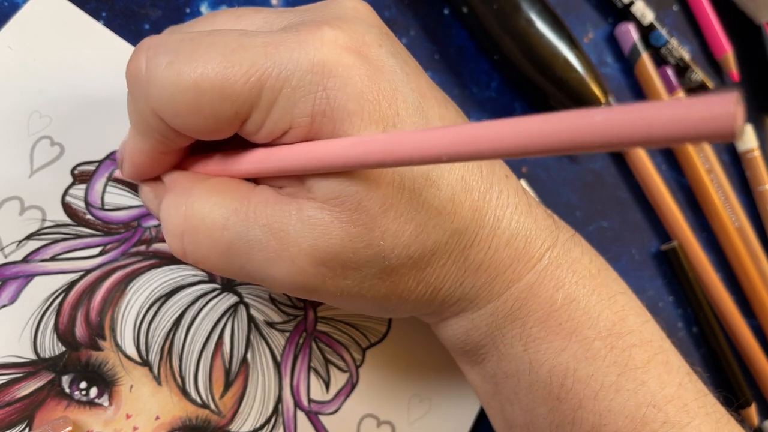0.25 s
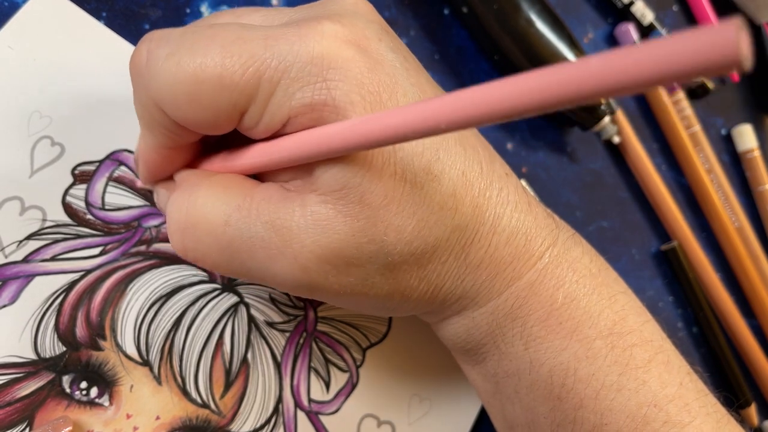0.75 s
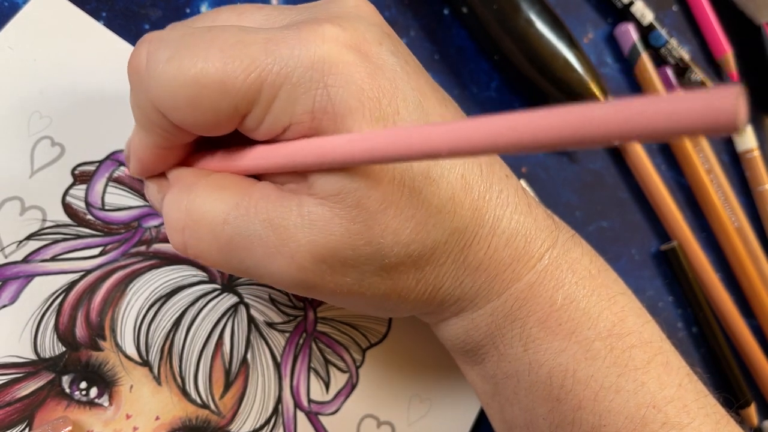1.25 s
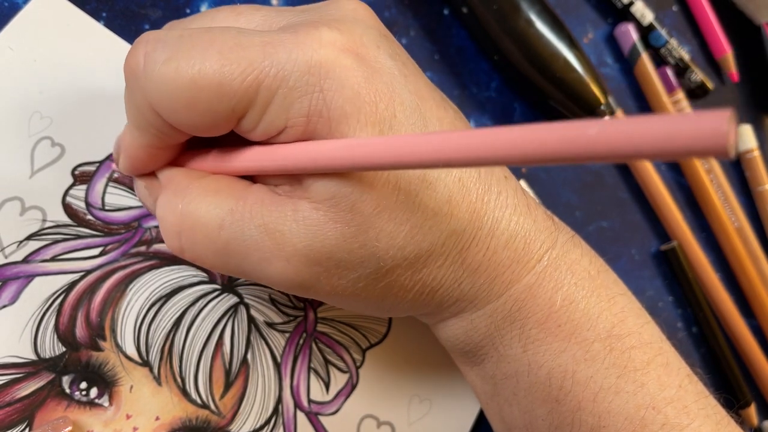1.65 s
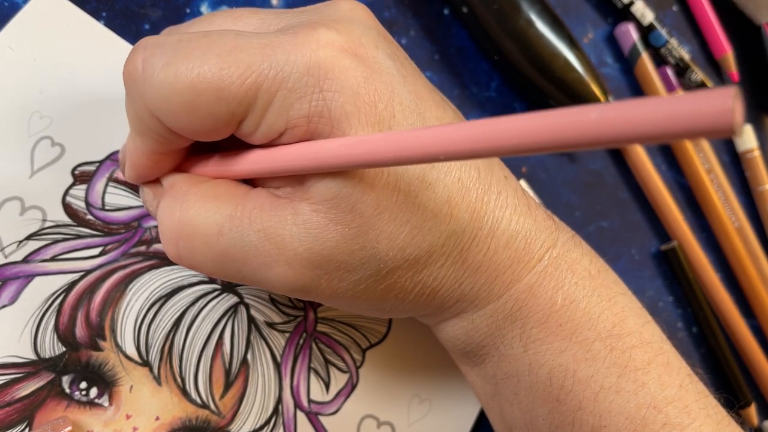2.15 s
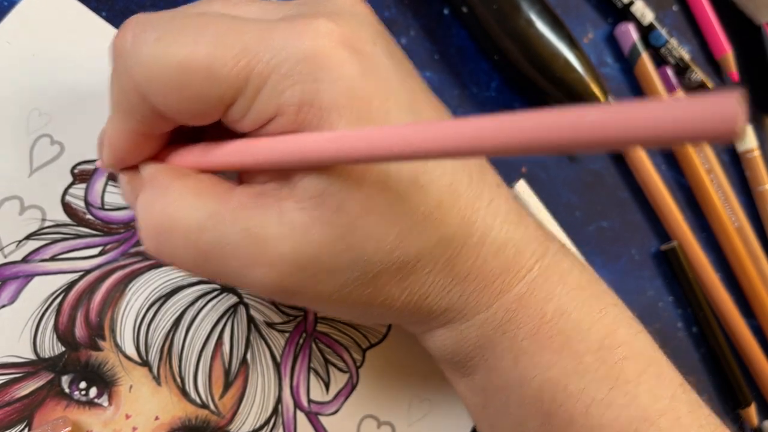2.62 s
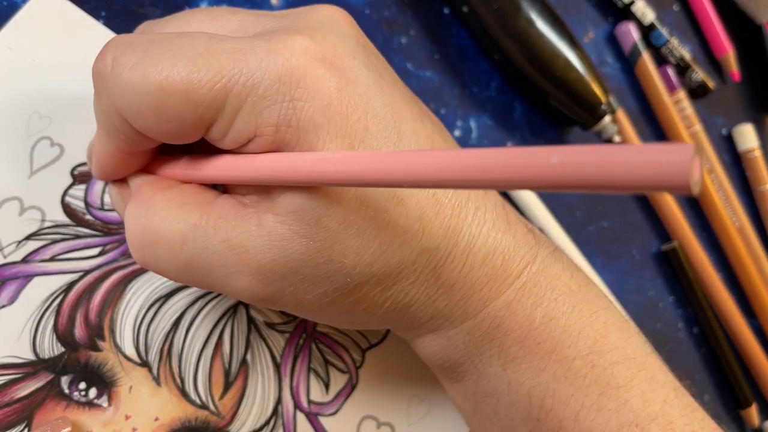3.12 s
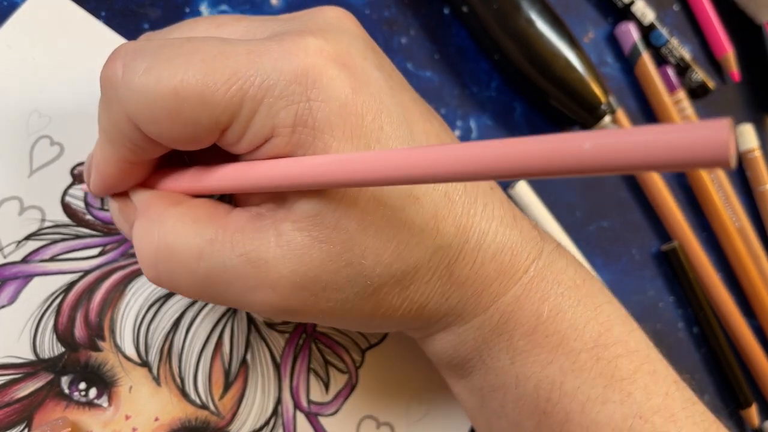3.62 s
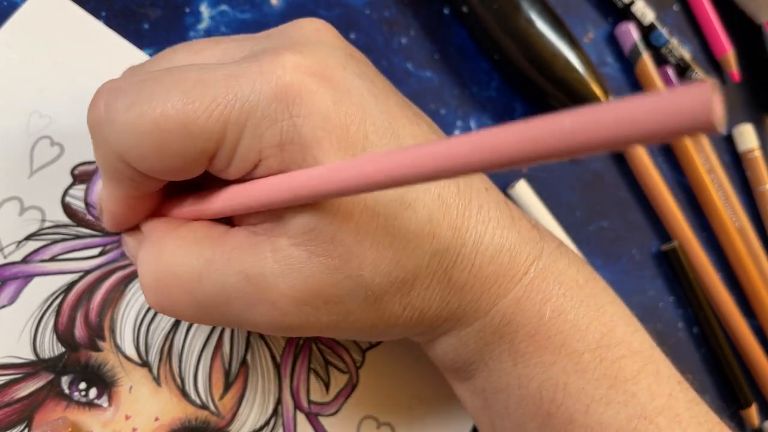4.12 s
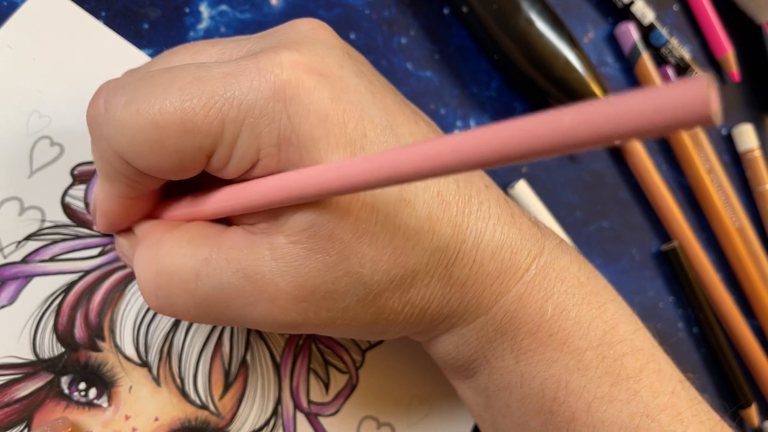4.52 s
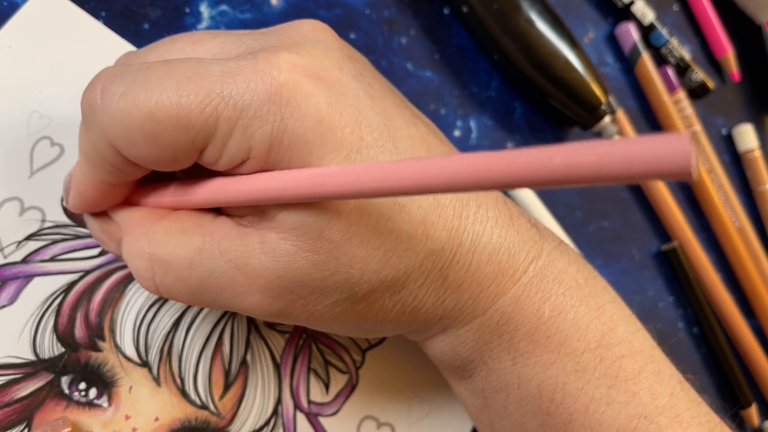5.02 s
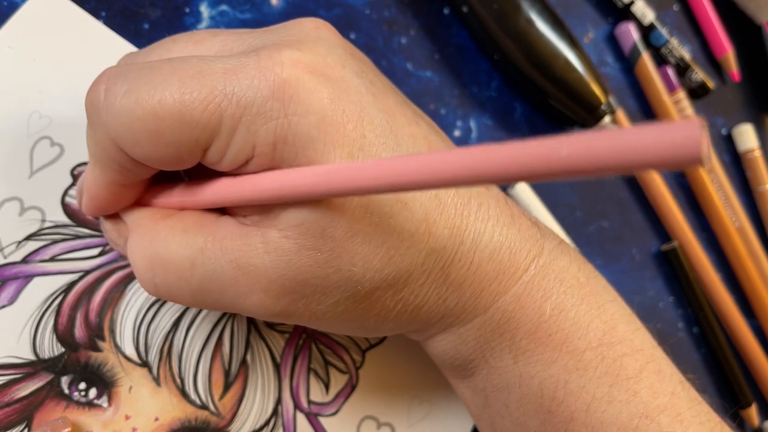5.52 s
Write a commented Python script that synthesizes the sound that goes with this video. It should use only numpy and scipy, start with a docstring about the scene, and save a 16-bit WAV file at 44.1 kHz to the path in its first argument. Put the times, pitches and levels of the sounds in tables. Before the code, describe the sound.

Close, light scratching of a colored pencil runs quickly back and forth over paper in a quiet indoor room. The pressure rises and falls, with a short slide and a single tick near the middle, then a brief lull before firmer shading picks up again. The desk murmurs softly under the hand. A low room rumble and faint fan hum continue throughout, and a far motor drone comes and goes.

```python
"""Coloured pencil shading paper

A pencil shades a small patch, about ten strokes a second, close by in a quiet room. Friction over the
paper's tooth excites resonances of pencil, paper and cupped hand, which change with the grip.
Midway the hand slides to a new place with one small tick. The desk murmurs under the strokes;
a fan hums, a far motor swells and fades, and the room rumbles."""
import sys
import numpy as np
from scipy import signal
from scipy.fft import rfft, irfft
from scipy.io import wavfile
from scipy.ndimage import uniform_filter1d

SR = 44100
rng = np.random.default_rng(int(sys.argv[2]) if len(sys.argv) > 2 else 0)


def generate_wav(signal):
    """Clip the signal to [-1, 1] and save it as 16-bit WAV at the path in sys.argv[1]."""
    frames = np.transpose(np.atleast_2d(signal))
    scaled = np.clip(frames, -1, 1) * 32767
    pcm = np.round(scaled).astype(np.int16)
    wavfile.write(sys.argv[1], SR, pcm)


N = 254016

# Resonances of pencil, paper and cupped hand in each grip: pitch_hz, width_hz, gain_db
UPRIGHT = [(2270, 790, -0.5), (3140, 700, -1.5), (3920, 340, 0), (4390, 450, -0.5), (5095, 430, 2),
           (5550, 200, -0.5), (6080, 360, -2), (6710, 900, -0.5), (8260, 630, -2.5), (9550, 670, -3),
           (10860, 1900, -4.5), (11900, 390, -3), (12600, 750, -5.5), (13900, 820, -7), (15300, 1900, -8)]
SLIDING = [(2190, 1200, -1), (3120, 1000, -1), (4711, 1500, 3), (5970, 1023, -1), (6941, 820, 3),
           (8200, 877, 3), (9260, 690, 0), (10662, 1925, -0.5), (13250, 4200, -9)]
FLAT = [(2220, 506, 2.5), (4100, 1500, -1.5), (4730, 500, 0.5), (5360, 1200, -3.5), (7400, 2077, -10),
        (9600, 1499, -9), (11421, 1447, -7.5), (14700, 3800, -15)]
TURNED = [(2273, 540, 2), (3070, 360, -2.5), (3930, 320, -4.5), (4620, 1050, -2), (5140, 830, -4.5),
          (6100, 580, -1.5), (6640, 810, -2.5), (8100, 650, -7), (9340, 1150, -7), (11375, 4000, -9.5),
          (12700, 700, -8), (13900, 600, -6), (14800, 1300, -4.5)]
# Grips in turn: start_s, resonances, forward_over_back_treble_db
GRIPS = [(0, UPRIGHT, 3), (2.47, SLIDING, -10), (2.72, FLAT, 2), (3.95, TURNED, 3)]
# Runs of alternating strokes; a crest is the place of the strongest rub, 0-1 along the stroke:
# first_middle_s, count, period_s, slowing_s_per_stroke, contact_s, forward_lag_and_back_lead_s,
# forward_over_back_db, forward_crest, back_crest
STROKE_RUNS = [(.054, 10, .1051, -.001, .076, -.001, 1, .56, .2),
               (1.056, 4, .113, -.004, .088, 0, -1.5, .58, .25),
               (1.488, 11, .101, -.0008, .052, .014, -1.5, .75, .25),
               (2.847, 9, .0927, .004, .076, -.003, 3, .6, .52),
               (4.053, 18, .1033, -.0005, .076, .002, 1, .48, .3)]
# Strength of the strokes as the hand bears down: time_s, relative_level_db
HAND_PRESSURE = [(0, -67.5), (.22, -68), (.55, -65), (.94, -68), (1.04, -60.5), (1.22, -64.5),
                 (1.65, -66.5), (1.8, -71), (2.25, -70.5), (2.45, -73), (2.85, -71.5), (3.37, -68),
                 (3.48, -75), (3.8, -79), (3.98, -64), (4.85, -68), (5.15, -66.5), (5.76, -69.5)]
# Drags of the lead as the hand moves to a new place: start_s, end_s, crest, relative_level_db
SLIDES = [(2.491, 2.571, 0.5, -66), (2.547, 2.637, 0.55, -61.5)]
# Impact of the pencil: start_s, level_db
TICKS = [(2.7487, -43.5)]
# Its heavily damped modes: pitch_hz, time_constant_s, gain_db
TICK_MODES = [(600, .0004, 2), (1900, .0003, -9), (4200, .0004, -2), (6000, .00035, -5.5),
              (7900, .0003, -12), (11000, .0001, -10)]
# Reflections from the desk top and a nearby surface: delay_s, gain_db
ECHOES = [(.0027, -14), (.0093, -18)]
# Resonances of the desk: pitch_hz, width_hz, gain_db
DESK_MODES = [(410, 220, 2.5), (630, 256, 0.5), (763, 63, -0.5), (861, 55, -0.5), (992, 99, -9),
              (1230, 345, -16)]
# Murmur of the desk under the hand: time_s, level_db
DESK_LEVELS = [(0, -60), (.6, -62), (1.2, -59), (2.4, -59.5), (3.3, -67), (4.3, -61.5), (4.9, -62),
               (5.5, -57)]
# Tones of the fan and its motor: pitch_hz, level_db
FAN_TONES = [(238, -65.5), (356, -68), (420, -80.5), (460, -62.5), (1183, -88.5), (1577, -93), (1841, -85)]
# Two groups of low room resonances: pitch_hz, width_hz, gain_db
RUMBLE_MODES = [(113.6, 24, -4), (132, 35, 2.5), (169, 26, -6.5)]
BOOM_MODES = [(276.9, 30.5, 7), (289.2, 38, -5)]
# Their rise and fall: time_s, rumble_db, boom_db
ROOM_LEVELS = [(.15, -49.5, -58), (.45, -56, -54), (1.0, -54, -51), (1.6, -53.5, -58.5), (2.2, -51.5, -56),
               (2.9, -57, -59), (3.6, -57.5, -61), (4.7, -60.5, -58.5), (5.76, -56.5, -60)]
# Spectrum of still air and microphone hiss: frequency_hz, relative_density_db
AIR_SPECTRUM = [(10, 2.5), (25, -5), (45, -3), (62, -6), (78, -13), (170, -15.5), (215, -17.5), (420, -18),
                (560, -32), (1000, -34.5), (1500, -40.5), (2400, -45), (5000, -47), (16000, -49.5)]

FRESH_DB, WORN_DB, WEAR_S = 3, -2, 0.98  # treble of a fresh and a flat edge; time constant of wear
TREBLE_HZ, CUTOFF_HZ = 8500, 15780
FORWARD_LONGER = 0.036  # share of the contact time that forward strokes gain and back strokes lose


def pencil():
    """Friction noise, filtered by resonance: each grip turns up a fresh edge that dulls as it wears."""
    out, rubs = np.zeros(N), strokes()
    middles_s = [(start + end) / 2 for start, end, *_ in rubs]
    grip_of = np.searchsorted([grip[0] for grip in GRIPS[1:]], middles_s)
    for grip, (grip_start, modes, push_db) in enumerate(GRIPS):
        rasp = resonate(tooth(grains_per_s=20000, spread_db=3, patchy_db=1.17), modes)
        treble = irfft(rfft(rasp) / (1 + (TREBLE_HZ / bins()) ** 8), N)
        for k in np.flatnonzero(grip_of == grip):
            start, end, crest, db, direction = rubs[k]
            freshness = np.exp(-max(start - grip_start, 0) / WEAR_S)
            edge_db = WORN_DB + (FRESH_DB - WORN_DB) * freshness
            treble_gain = undb(edge_db + direction * push_db / 2)
            out += undb(db) * tip_speed(start, end, crest) * (rasp + (treble_gain - 1) * treble)
    return out


def tooth(grains_per_s, spread_db, patchy_db):
    """Shot noise: the lead snaps over paper fibres at random, in smoother and rougher patches."""
    hit = rng.random(N) < grains_per_s / SR
    size = rng.choice([-1, 1], N) * undb(spread_db * rng.standard_normal(N))
    return hit * size * undb(patchy_db * wander(rate_hz=200))


def strokes():
    """The hand oscillates at a drifting pace. Slides and strokes: start_s, end_s, crest, db, direction."""
    rubs = [(*slide, 1) for slide in SLIDES]
    for first, count, period, slowing, contact, lag, accent_db, forward_crest, back_crest in STROKE_RUNS:
        for k in range(count):
            direction, crest = (1, forward_crest) if k % 2 else (-1, back_crest)
            middle = first + period * k + slowing * k * k / 2 + direction * lag
            half = contact * (1 + direction * FORWARD_LONGER) / 2
            db = np.interp(middle, *np.transpose(HAND_PRESSURE)) + direction * accent_db / 2
            rubs.append((middle - half, middle + half, crest, db, direction))
    return rubs


def tip_speed(start, end, crest):
    """Friction noise grows in proportion to speed, which rises from rest and falls to zero at the turn."""
    crest_s = start + crest * (end - start)
    progress = np.interp(times(), [start, crest_s, end], [0, .5, 1])
    return np.sin(np.pi * progress)


def tick():
    """Impact on something hard excites damped modes that swell and die within a millisecond or two."""
    out, t = np.zeros(N), times()[:SR // 20]
    ring = sum(undb(db) * np.sin(2 * np.pi * hz * t) * t / tau * np.exp(1 - t / tau)
               for hz, tau, db in TICK_MODES)
    for start_s, db in TICKS:
        i = int(start_s * SR)
        out[i:i + len(t)] -= undb(db) * ring
    return out


def reflect(x):
    """Comb filtering: early echoes from nearby surfaces interfere with the direct sound."""
    response = 1 + sum(undb(db) * np.exp(-2j * np.pi * bins() * delay) for delay, db in ECHOES)
    return irfft(rfft(x) * response, N)


def desk(stroke_share):
    """Forced vibration: the desk murmurs under the moving hand, a little more during each stroke."""
    motion = unit(sum(tip_speed(start, end, crest) for start, end, crest, _, _ in strokes()))
    body = resonate(tooth(grains_per_s=5000, spread_db=5, patchy_db=0.75), DESK_MODES)
    return body * undb(curve(DESK_LEVELS)) * (1 - stroke_share + stroke_share * motion)


def room():
    """Room resonance: low modes excited by noise rumble and boom at slowly changing levels."""
    rumble = resonate(rng.standard_normal(N), RUMBLE_MODES) * undb(curve(ROOM_LEVELS, column=1))
    boom = resonate(rng.standard_normal(N), BOOM_MODES) * undb(curve(ROOM_LEVELS, column=2))
    return rumble + boom


def fan():
    """Steady rotation radiates faint tones, each broadened by turbulence."""
    return sum(undb(db) * tone(hz, width_hz=10, noise_ratio=.65) for hz, db in FAN_TONES)


def far_motor(pitch_hz=107.7, start_s=1.55, attack_s=.58, hold_s=.69, release_s=.6, level_db=-53):
    """Periodic vibration of a distant motor: a drone that swells, holds and decays exponentially."""
    age = times() - start_s
    swell = np.clip(age / attack_s, 0, 1)
    fade = np.exp(-np.maximum(age - attack_s - hold_s, 0) / release_s)
    return tone(pitch_hz, width_hz=20, noise_ratio=.55) * swell * fade * undb(level_db)


def air(level_db=-50.5):
    """The noise floor: still air and microphone hiss, strongest in the bass."""
    hz, db = np.transpose(AIR_SPECTRUM)
    spectrum = undb(np.interp(np.log(bins()), np.log(hz), db))
    return unit(irfft(rfft(rng.standard_normal(N)) * spectrum, N)) * undb(level_db)


def mic_drift(corner_hz=0.4, level_db=-29.5):
    """Offset drift: the microphone's zero level wanders slowly, far below hearing."""
    offset = irfft(rfft(rng.standard_normal(N)) / (1 + (bins() / corner_hz) ** 4), N)
    return unit(offset - offset.mean()) * undb(level_db)


def resonate(x, modes):
    """Resonant filtering: x passes through steep resonances whose powers add; rms 1."""
    f = bins()
    power = sum(undb(2 * db) / (1 + ((f ** 2 - hz ** 2) / (f * width)) ** 2) ** 2
                for hz, width, db in modes)
    return unit(irfft(rfft(x) * np.sqrt(power), N))


def tone(hz, width_hz, noise_ratio):
    """Line broadening: turbulence surrounds a sine with a narrow band of noise; rms 1."""
    line = np.sin(2 * np.pi * (hz * times() + rng.random()))
    band = resonate(rng.standard_normal(N), [(hz, width_hz, 0)])
    return unit(unit(line) + noise_ratio * band)


def wander(rate_hz):
    """Random steps smoothed into ramps; rms 1."""
    hold = int(SR / rate_hz)
    steps = np.repeat(rng.standard_normal(N // hold + 1), hold)
    return unit(uniform_filter1d(steps, hold)[:N])


def curve(rows, column=1):
    """One column of a timed table, interpolated at every sample."""
    columns = np.transpose(rows)
    return np.interp(times(), columns[0], columns[column])


def undb(db):
    """Decibels to amplitude ratio."""
    return 10 ** (np.asarray(db) / 20)


def unit(x):
    """Scale to rms 1."""
    return x / np.sqrt(np.mean(x ** 2))


def times():
    """The time of every sample in seconds."""
    return np.arange(N) / SR


def bins():
    """The frequency of every spectral bin in hertz, kept above zero."""
    return np.maximum(np.arange(N // 2 + 1), 1) * SR / N


def scene():
    """Superposition: pencil, desk and background add at one microphone."""
    near = reflect(undb(1.74) * pencil() + tick())
    murmur = desk(stroke_share=0.08)
    background = air() + room() + far_motor() + fan() + mic_drift()
    return (near + murmur + background)[None]


def record(dry):
    """Band limiting: a steep low-pass filter removes the highest treble."""
    return signal.sosfilt(signal.ellip(10, .1, 70, CUTOFF_HZ, fs=SR, output="sos"), dry)


dry = scene()
out = record(dry)
generate_wav(out)
```